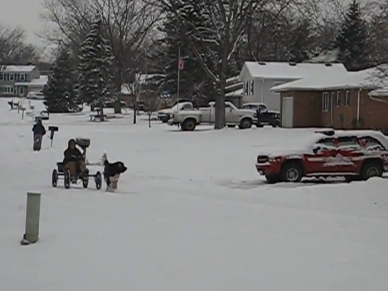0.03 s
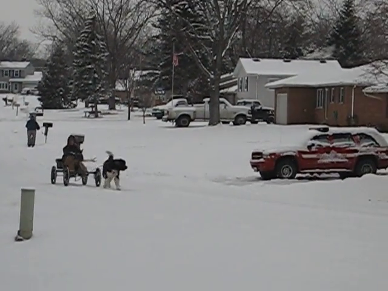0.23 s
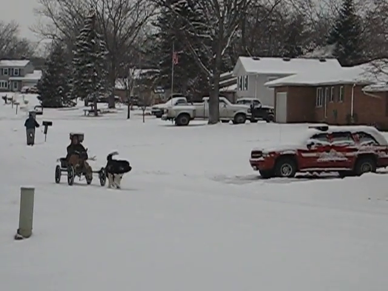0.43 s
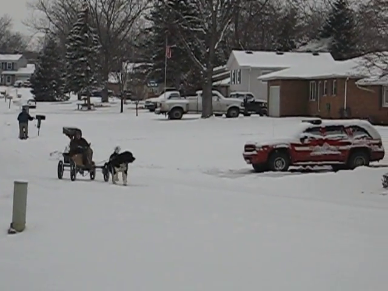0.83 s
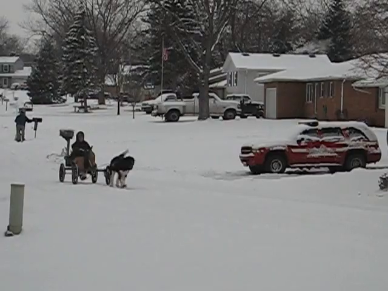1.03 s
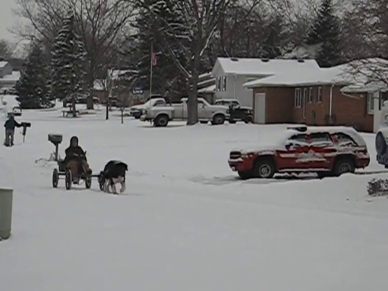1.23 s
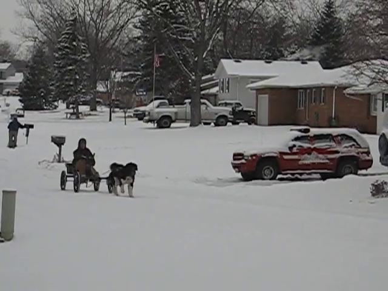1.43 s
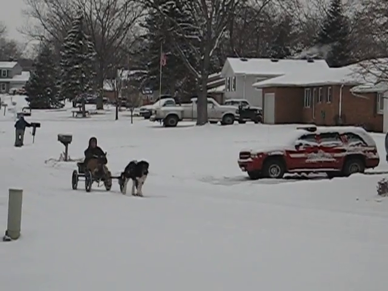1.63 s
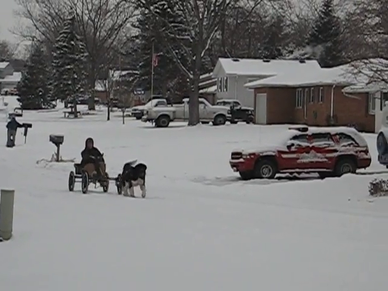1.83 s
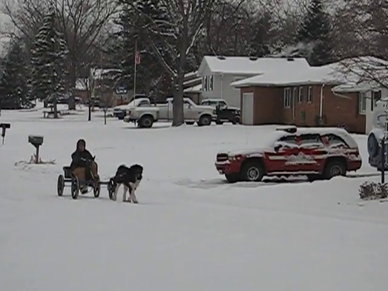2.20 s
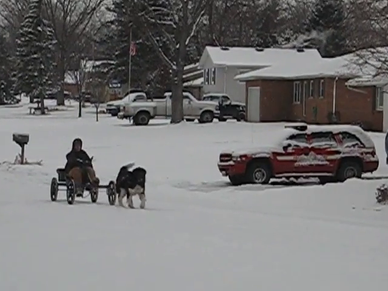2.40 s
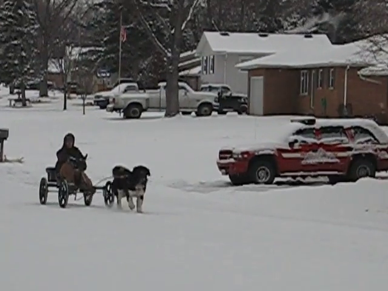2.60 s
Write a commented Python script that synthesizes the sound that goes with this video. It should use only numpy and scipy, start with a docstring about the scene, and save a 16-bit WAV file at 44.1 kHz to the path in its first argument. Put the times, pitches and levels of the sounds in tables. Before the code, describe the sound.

A dog whines in three short bouts of thin, warbling squeals, the first loudest, the later two fainter and hissy. Faint harness ticks fall between them on a quiet street, over low rumble and a small camera's steady high tone.

```python
"""Low outdoor rumble and a small camera's steady whine on a quiet snowy street, then a puff of hiss.
A few faint harness ticks fall around three bouts of thin, warbling squeals, most likely a dog's
whistling whine. The first is loud and clear; the later two break into two tones over hissing air.
A near surface echoes squeals, hiss and ticks back to the microphone of the narrow-band camera."""
import sys
import numpy as np
from scipy import signal
from scipy.fft import rfft, irfft, next_fast_len
from scipy.io import wavfile
from scipy.ndimage import uniform_filter1d

SR = 44100
rng = np.random.default_rng(int(sys.argv[2]) if len(sys.argv) > 2 else 0)


def bounce(signal):
    """Save signal as a 16-bit WAV file at the path given by the first command-line argument."""
    frames = np.transpose(np.atleast_2d(signal))
    limited = np.clip(frames, -1, 1)
    pcm = np.round(limited * 32767).astype(np.int16)
    wavfile.write(sys.argv[1], SR, pcm)


N = 121275


def undb(db):
    """Decibels to gain."""
    return 10 ** (np.asarray(db) / 20)


def unit(x):
    """Scale to rms 1."""
    return x / np.sqrt(np.mean(x ** 2))


def shape(x, gain):
    """Filter by a gain that is a function of frequency."""
    size = next_fast_len(N + SR // 10)
    hz = np.maximum(np.fft.rfftfreq(size, 1 / SR), 1)
    return irfft(rfft(x, size) * gain(hz), size)[:N]


def colour(x, points):
    """Filter by a curve through (frequency [Hz], gain [dB]) points."""
    hz, db = np.array(points).T
    return shape(x, lambda f: undb(np.interp(np.log(f), np.log(hz), db)))


def band(hz, width_hz):
    """Noise in a bell-shaped band, rms 1; centred on zero it is a random wander."""
    return unit(shape(rng.standard_normal(N), lambda f: np.exp(-.5 * ((f - hz) / width_hz) ** 2)))


def street(t):
    """Distant low rumble under an even hiss; the low middle swells softly once."""
    # spectrum of the open street: (frequency [Hz], relative level [dB])
    spectrum = [(12, -20.5), (22, -0.5), (65, 2), (125, -6.5), (180, -4), (350, -15), (780, -15.5),
                (1200, -21), (3200, -21.5), (4200, -21.5), (5200, -26), (5500, -26)]
    air = shape(colour(rng.standard_normal(N), spectrum), lambda f: f < SR / 8)
    air_db = -38 + .98 * band(0, width_hz=2.5)
    swell_peak_s, swell_width_s = .655, .24
    swell = undb(-50.5) * np.exp(-.5 * ((t - swell_peak_s) / swell_width_s) ** 2)
    return undb(air_db) * unit(air) + swell * band(600, width_hz=220)


def camera_whine(t, hz=3404):
    """A thin steady tone from the camera itself, drifting slowly in level."""
    # drift of the whine: (time [s], level [dB])
    drift = [(0, -50), (.5, -49.5), (1.1, -51), (1.6, -55.5), (2.2, -55.5), (2.75, -52.5)]
    db = np.interp(t, *np.array(drift).T) + .8 * band(0, width_hz=7.4)
    return np.sqrt(2) * undb(db) * np.sin(2 * np.pi * hz * t)


def hiss(t):
    """Air that half locks into a whistle: a band of noise with an unsteady chirp wandering through it."""
    # puffs of air, loudest round the squeals: (start [s], end [s], level [dB], centre [Hz])
    puffs = [(0.013, 0.089, -44.5, 3599), (.25, 0.282, -30.5, 4050), (0.305, 0.433, -31.5, 4968),
             (0.544, 0.578, -51, 5090), (0.642, 0.651, -49.5, 4500), (0.936, 0.971, -47, 3842),
             (1.2, 1.225, -58, 4144), (1.624, 1.764, -42.5, 4229), (1.811, 1.853, -48.5, 2977),
             (2.292, 2.403, -40, 4090), (2.399, 2.495, -39.5, 4710), (2.541, 2.547, -46, 5325)]
    attack_s, release_s = .016, .0099
    chirp_share, swing_hz = .55, 480
    out = np.zeros(N)
    for start, end, db, hz in puffs:
        envelope = np.exp(-np.maximum(start - t, 0) / attack_s - np.maximum(t - end, 0) / release_s)
        pitch = hz + swing_hz * band(0, width_hz=45)
        phase = 2 * np.pi * np.cumsum(pitch) / SR
        flicker = np.abs(band(0, width_hz=70)) ** .5
        chirp = np.sqrt(chirp_share) * unit(flicker * np.sin(phase))
        air = np.sqrt(1 - chirp_share) * band(hz, width_hz=711)
        out += undb(db) * envelope * (chirp + air)
    return out


def harness(t):
    """Short dry ticks of a harness: noise that starts sharply and dies in milliseconds."""
    # harness ticks: (time [s], level [dB], decay [s])
    ticks = [(0.222, -31.5, 0.0055), (0.734, -38, 0.0095), (0.78, -32.5, 0.004), (0.912, -39, 0.0017),
             (1.285, -31.5, 0.0019), (1.301, -38, 0.0025), (1.371, -28, 0.00176)]
    # spectrum of a tick: (frequency [Hz], relative level [dB])
    spectrum = [(300, -38), (1300, -4), (2300, 0.5), (4800, -6), (7000, -11)]
    envelope = sum(undb(db) * (t >= s) * np.exp(-np.abs(t - s) / decay) for s, db, decay in ticks)
    return envelope * unit(colour(rng.standard_normal(N), spectrum))


def squeals(t):
    """Nearly pure whistles, most likely a dog's, that glide and flutter, each with a faint octave."""
    # one unbroken glide per squeal, each a list of (time [s], pitch [Hz], level [dB])
    glides = [
        [(.243, 3339, -43.5), (.268, 3620, -31), (.276, 4020, -29), (.280, 4420, -18.5), (.287, 5184, -21),
         (.307, 5143, -20), (.319, 3721, -22.5), (.335, 3914, -16.5), (.340, 4800, -21), (.346, 5439, -22),
         (.355, 5480, -24), (.370, 4330, -20.5), (.382, 3842, -21), (.393, 4247, -18.5), (.402, 5093, -25),
         (.413, 5126, -22), (.429, 4400, -33)],
        [(1.635, 5690, -36), (1.642, 4900, -40), (1.651, 4175, -33), (1.660, 4353, -32.5), (1.668, 4150, -49.5)],
        [(1.648, 5269, -43), (1.663, 4950, -36.5), (1.676, 5247, -42.5)],
        [(1.669, 3474, -38), (1.679, 4916, -49), (1.688, 5753, -43)],
        [(1.709, 5590, -40.5), (1.727, 4984, -40), (1.746, 5148, -36)],
        [(1.719, 3719, -45.5), (1.731, 4365, -31.5), (1.738, 4150, -32), (1.746, 4391, -29), (1.755, 5348, -34)],
        [(1.747, 5162, -38.5), (1.754, 4194, -40.5), (1.761, 3372, -39)],
        [(1.760, 4135, -39), (1.770, 4814, -37), (1.786, 5150, -34.5), (1.808, 5743, -32.5),
         (1.816, 5450, -35.5)],
        [(1.838, 4354, -46), (1.843, 5050, -45.5), (1.849, 5450, -40.5)],
        [(1.864, 5600, -36.5), (1.869, 5475, -39.5), (1.878, 4420, -54)],
        [(1.912, 4800, -47.5), (1.921, 5180, -44.5), (1.938, 4975, -48.5)],
        [(2.311, 5375, -36.5), (2.320, 4765, -37), (2.330, 4348, -27), (2.339, 4513, -29), (2.348, 4141, -36.5),
         (2.361, 4770, -32.5)],
        [(2.328, 5515, -34), (2.343, 5115, -35.5), (2.361, 5294, -38.5)],
        [(2.402, 3424, -34.5), (2.410, 3841, -52.5), (2.415, 4598, -36), (2.426, 5300, -29.5),
         (2.437, 5213, -31.5), (2.452, 4839, -43.5), (2.464, 4450, -41)],
        [(2.420, 4391, -35), (2.433, 3981, -40), (2.442, 4105, -35), (2.449, 5000, -39), (2.460, 5310, -35.5)],
        [(2.481, 5285, -45.5), (2.492, 4870, -40), (2.501, 4770, -48.5)],
    ]
    smooth_s, fade_s, flutter_hz = .003, .0052, 350
    knee_hz, fall_db_per_hz = 4400, .02  # the octave dies away as the pitch climbs past the knee
    jitter = 1 + .009 * band(0, flutter_hz)
    shimmer_db = 1.6 * band(0, flutter_hz)
    out = np.zeros(N)
    for glide in glides:
        times, hz, db = np.array(glide).T
        pitch = uniform_filter1d(np.interp(t, times, hz), int(smooth_s * SR)) * jitter
        phase = 2 * np.pi * np.cumsum(pitch) / SR
        gate = np.clip(np.minimum(t - times[0], times[-1] - t) / fade_s + 1, 0, 1)
        envelope = gate ** 2 * undb(np.interp(t, times, db) + shimmer_db)
        octave_gain = undb(-22 - fall_db_per_hz * np.maximum(pitch - knee_hz, 0))
        out += np.sqrt(2) * envelope * (np.sin(phase) + octave_gain * np.sin(2 * phase))
    return out


def outdoors(direct, t, echo_s=.022, t60_s=.5):
    """The direct sound, one echo off a near surface and a weak tail from houses and trees farther off."""
    near = np.interp(t - echo_s, t, direct)
    tail = rng.standard_normal(N) * np.exp(-np.log(1000) * t / t60_s) * (t > echo_s)
    far = signal.fftconvolve(direct, tail / np.linalg.norm(tail))[:N]
    return direct + undb(-16.5) * near + undb(-27) * far


def scene():
    """At the microphone: squeals, hiss and ticks in the open street, over rumble and camera whine."""
    t = np.arange(N) / SR
    direct = squeals(t) + hiss(t) + harness(t)
    return (outdoors(direct, t) + street(t) + camera_whine(t))[None]


def record(dry):
    """The camera samples at a quarter rate, so tones mirror about 5.5 kHz before the treble rolls off."""
    # the camera's treble roll-off: (frequency [Hz], gain [dB])
    roll_off = [(4500, -1.5), (5000, 0), (5500, -2), (6025, -10.5), (6325, -19.5), (6625, -28),
                (6925, -41.5), (7200, -59)]
    top_hz = 7250
    coarse = dry[0] * 4 * (np.arange(N) % 4 == 0)
    steep_lowpass = signal.ellip(8, .2, 70, top_hz, fs=SR, output="sos")
    return signal.sosfilt(steep_lowpass, colour(coarse, roll_off))[None]


dry = scene()
out = record(dry)
bounce(out)
```